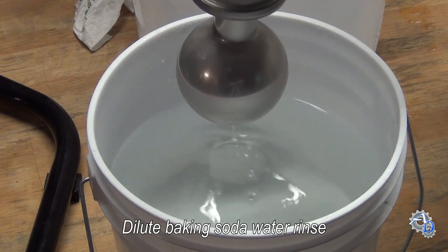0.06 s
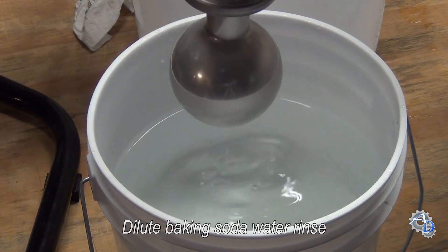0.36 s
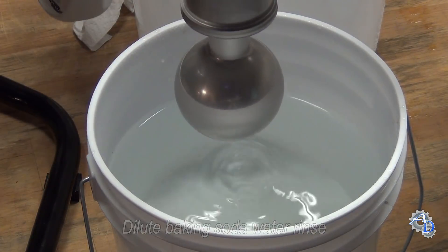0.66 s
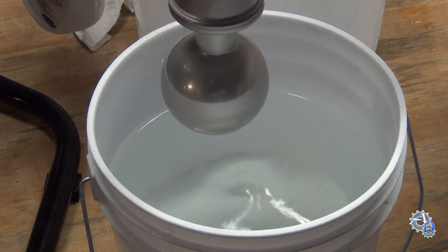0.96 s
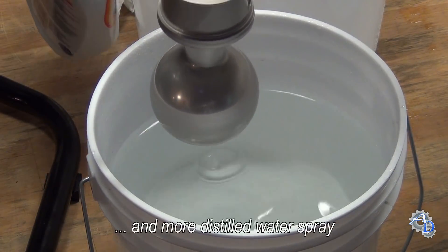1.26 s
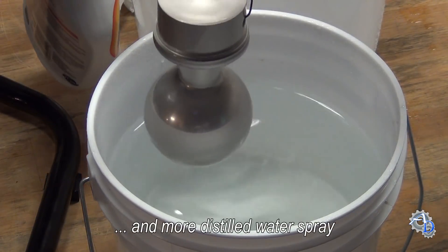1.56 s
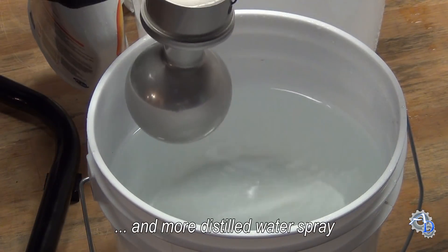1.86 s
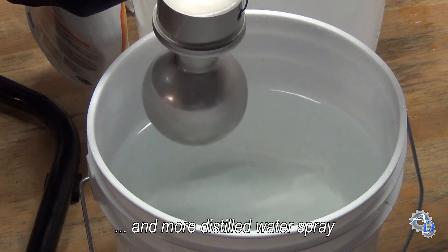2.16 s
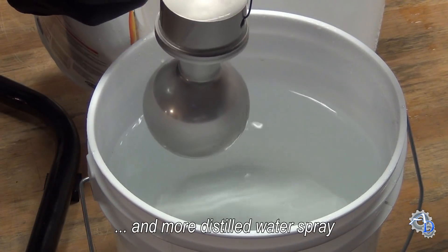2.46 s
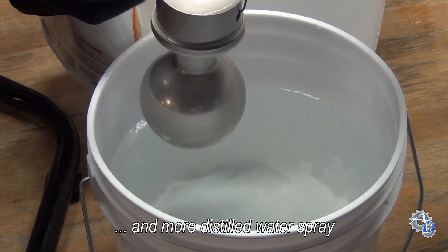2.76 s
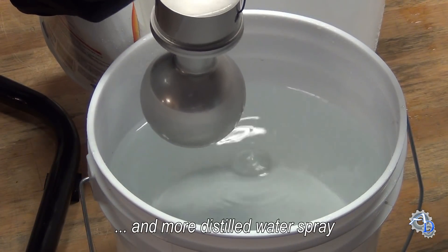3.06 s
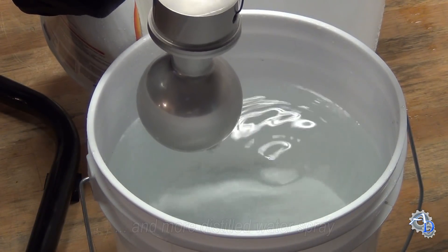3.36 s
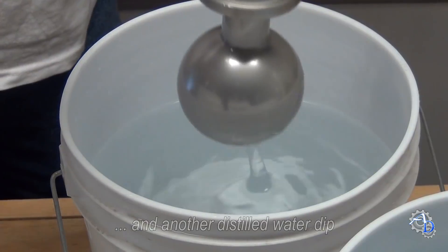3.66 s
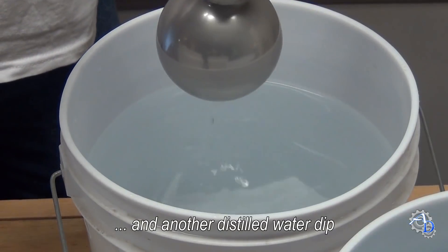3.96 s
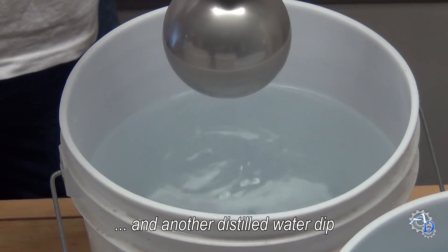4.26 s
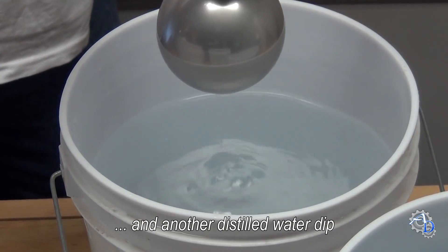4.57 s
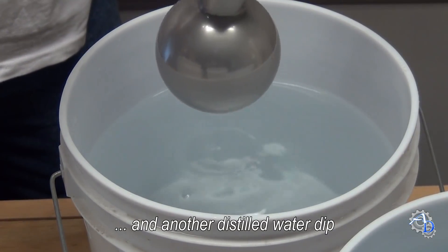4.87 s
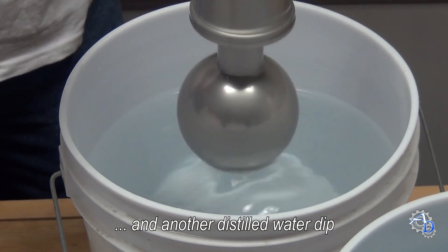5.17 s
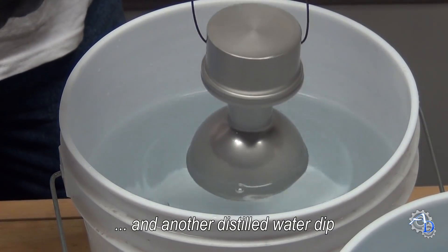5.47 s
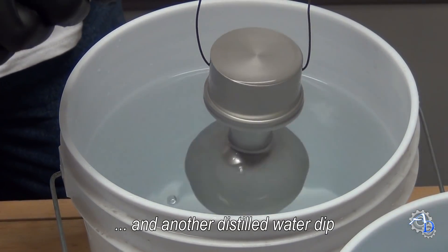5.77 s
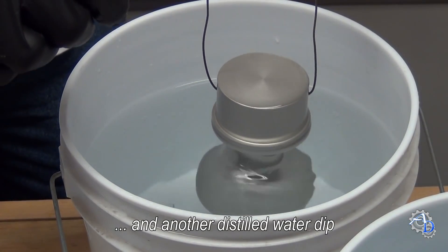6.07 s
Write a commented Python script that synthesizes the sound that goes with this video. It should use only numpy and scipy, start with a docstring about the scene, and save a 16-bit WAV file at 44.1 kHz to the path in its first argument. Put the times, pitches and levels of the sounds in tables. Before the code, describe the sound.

A trigger spray bottle gives eight short hissing, clicking squirts, then a few drops plink into a bucket of water.

```python
"""Rinsing a steel ball

A trigger spray bottle rinses a steel ball over a plastic bucket of water. In eight short squirts the jet breaks
into hissing mist; the trigger clicks, and the piston rasps as it is primed and as its spring returns it. Drops
fall from the ball and slap the water, some trapping a bubble that rings. The bucket and a small workshop
reflect the sound, and a fan whirs faintly."""
import sys
import numpy as np
from scipy import signal
from scipy.fft import rfft, irfft, next_fast_len
from scipy.io import wavfile
from scipy.ndimage import uniform_filter1d

SR = 44100
rng = np.random.default_rng(int(sys.argv[2]) if len(sys.argv) > 2 else 0)


def generate_wav(sig):
    """Save sig (samples, or channels by samples) to the path in sys.argv[1] as 16-bit PCM at SR."""
    pcm = np.round(np.clip(np.atleast_2d(sig).T, -1, 1) * 32767).astype(np.int16)
    wavfile.write(sys.argv[1], SR, pcm)


N = 270332

# Squeezes of the trigger, with relative levels: (time [s], pressure rise [s], stroke length [s],
# hiss [dB], click [dB], nozzle whistle [Hz], hollow note [Hz], hollow note level [dB])
SQUEEZES = [ (0.672, 0.031, 0.069, -26.5, -38.5, 8950, 3380, -37),
            (0.93, .044, .075, -24, -48, 8600, 3850, -33), (1.858, 0.022, 0.071, -27, -41, 8130, 2250, -26),
            (2.158, 0.035, 0.079, -26.5, -41, 7210, 2180, -26),
            (2.441, 0.039, 0.081, -27, -44, 7300, 2140, -23.5),
            (2.7161, 0.032, 0.081, -23, -35.5, 7600, 1990, -24),
            (2.990, 0.033, 0.068, -23.5, -44.5, 7600, 1910, -23.5),
            (3.249, 0.044, 0.062, -24, -42, 7600, 1850, -23.5), ]
# Spectrum of the mist's hiss: (frequency [Hz], spectral level [dB])
MIST_SPECTRUM = [(590, -38.5), (1000, -28.5), (1180, -22.5), (1610, -28), (1910, -23.5), (2620, -21.5),
                 (4730, -13.5), (5500, -12), (7440, -1.5), (8750, 0.5), (10300, -7), (12500, -11),
                 (15500, -25), (16000, -32)]
# Resonances of the nozzle head: (frequency [Hz], bandwidth [Hz], gain [dB])
NOZZLE_MODES = [(5120, 890, -15.5), (7150, 130, 0.5), (7714, 170, 2), (8615, 110, 1.5), (9460, 180, -4),
                (11400, 480, -5), (12200, 270, -5), (12700, 210, -15)]
# Response of the plastic housing: (frequency [Hz], spectral level [dB])
PLASTIC_SPECTRUM = [(150, -31), (450, -6), (1000, -6.5), (2000, -6), (3100, -0.5), (4000, 0), (5100, -2.5),
                    (7000, 0.5), (9500, -13), (14000, -26)]


def amp(db):
    """Amplitude ratio of a level in decibels."""
    return 10 ** (np.asarray(db) / 20)


def unit_rms(x):
    """Normalise to rms 1."""
    return x / np.sqrt(np.mean(x ** 2) + 1e-20)


def unit_peak(x):
    """Normalise so that the loudest millisecond has rms 1."""
    return x / np.sqrt(uniform_filter1d(x ** 2, size=44).max() + 1e-20)


def curve_at(points, hz):
    """Interpolate (frequency [Hz], value) points on a logarithmic frequency axis."""
    freqs, values = np.transpose(points)
    return np.interp(np.log(hz + 1), np.log(freqs + 1), values)


def add(track, start, x):
    """Superpose x on the track from start [s] on."""
    part = track[max(round(start * SR), 0):][:len(x)]
    part += x[:len(part)]


def filtered(x, response):
    """Linear filtering: multiply the spectrum of x by a complex frequency response."""
    n = x.shape[-1]
    size = next_fast_len(n + 8192)
    return irfft(rfft(x, size) * response(np.fft.rfftfreq(size, 1 / SR)), size)[..., :n]


def coloured(x, spectrum):
    """Minimum-phase filtering by a curve of (frequency [Hz], gain [dB])."""
    size = 1024
    gain = amp(curve_at(spectrum, np.fft.rfftfreq(size, 1 / SR)))
    cepstrum = irfft(np.log(gain + 1e-6))
    cepstrum[1:size // 2] *= 2  # folding the cepstrum makes the filter causal
    cepstrum[size // 2 + 1:] = 0
    return signal.fftconvolve(x, irfft(np.exp(rfft(cepstrum))))[:len(x)]


def resonate(x, modes):
    """Forced response of parallel damped modes: (frequency [Hz], bandwidth [Hz], gain [dB])."""
    return filtered(x, lambda f: sum(amp(db) * 1j * f * width / (hz * hz - f * f + 1j * f * width)
                                     for hz, width, db in modes))


def grains(n, rate, scatter_db):
    """Shot noise: random impulses of log-normal size, rate per second on average, rms 1."""
    impulses = (rng.random(n) < rate / SR) * rng.choice([-1, 1], n)
    return unit_rms(impulses * amp(scatter_db * rng.standard_normal(n)))


def burst(t60):
    """Exponentially damped noise, falling 60 dB in t60 seconds."""
    t = np.arange(SR // 10) / SR
    return rng.standard_normal(len(t)) * amp(-60 * t / t60)


def fan(shift_at_s=3.49, shift_s=0.015):
    """Flow noise: a broadband rush with narrow whirs; the background's levels step once after the spraying."""
    # Rush of air: (frequency [Hz], spectral level [dB])
    air_spectrum = [(25, -30), (45, -4), (80, 0), (170, 0.5), (320, 0), (600, -2), (1000, -4), (1500, -7.5),
                    (3000, -10), (5500, -13), (7600, -11.5), (9500, -17.5), (16000, -23.5)]
    # Likeness of the rush in the two ears: (frequency [Hz], correlation [ratio])
    correlation = [(60, 0.18), (180, 0.69), (550, 0.79), (1650, 0.97), (4970, 0.97), (15000, 0.89)]
    # Whirs: (frequency [Hz], half-width [Hz], level before the shift [dB], level after it [dB])
    whirs = [(879.8, 29, -63.5, -67), (231.6, 6.3, -69.5, -79), (91.6, 6.4, -75.5, -72),
             (214, 160, -91, -69)]

    def level(before_db, after_db):
        return amp(np.interp(np.arange(N) / SR, [shift_at_s, shift_at_s + shift_s], [before_db, after_db]))

    def mid_side_gains(hz):
        angle = np.arccos(np.clip(curve_at(correlation, hz), -1, 1)) / 2
        return amp(curve_at(air_spectrum, hz)) * [np.cos(angle), np.sin(angle)]

    mid, side = filtered(rng.standard_normal((2, N)), mid_side_gains)
    air = unit_rms(np.array([mid + side, mid - side])) * level(before_db=-58, after_db=-59.5)
    for hz, width, before_db, after_db in whirs:
        whir = filtered(rng.standard_normal(N), lambda f: 1 / (1 + ((f - hz) / width) ** 2))
        air += unit_rms(whir) * level(before_db, after_db)
    return air


def workshop(x, side_gain=0.014):
    """Reverberation: each frequency decays at its own rate, nearly alike in both ears."""
    # Decay of the room: (frequency [Hz], reverberation time [s])
    decay_times = [(300, 0.24), (2000, 0.49), (8000, 0.24), (15000, 0.18)]
    hz, t, noise = signal.stft(rng.standard_normal((2, SR // 2)), SR, nperseg=256)
    decay = amp(-60 * t / curve_at(decay_times, hz)[:, None])
    tail = signal.istft(noise * decay, SR, nperseg=256)[1]
    tail *= np.arange(tail.shape[1]) / SR > 0.005  # delay of the first reflection
    mid, side = signal.fftconvolve(x[None], tail / np.linalg.norm(tail[0]), axes=1)[:, :N]
    return np.array([mid + side_gain * side, mid - side_gain * side])


def bucket(x, echo_db=-7, t60=0.046):
    """Multiple reflection between the walls and the water adds dense, brief echoes to the sound."""
    t = np.arange(SR // 10) / SR
    echoes = grains(len(t), rate=2600, scatter_db=-1.0) * amp(-60 * t / t60) * (t > 0.001)
    return x + amp(echo_db) * signal.fftconvolve(x, echoes / np.linalg.norm(echoes))[:N]


def settling_mist(level_db=-36, fade_db_per_s=22):
    """Many tiny impacts sum to a faint, fading patter as mist lands on the water and the bucket."""
    out = np.zeros(N)
    t = np.arange(SR) / SR
    for start, _, length, db, *_ in SQUEEZES:
        impacts = grains(SR, rate=900, scatter_db=1.5) + rng.standard_normal(SR)
        envelope = np.minimum(t / length, 1) * amp(db + level_db - fade_db_per_s * t)
        add(out, start, envelope * unit_rms(coloured(impacts, PLASTIC_SPECTRUM)))
    return out


def dribble(until_s=1.1, drops_per_s=10, db=-45.5, centre_hz=4000, width_hz=4000):
    """Fine drops leave the wet ball at random: rows for drop_impacts, within an octave of centre_hz."""
    draws = rng.random((round(until_s * drops_per_s), 2))
    return [(until_s * when, db, centre_hz * 2 ** (2 * pitch - 1), width_hz) for when, pitch in draws]


def drop_impacts(splash_gain=0.16):
    """Impact sound: each drop gives the water one sharp pressure pulse and a little splash."""
    # Drops striking the water: (time [s], peak level [dB], band centre [Hz], bandwidth [Hz])
    drops = [(0.0516, -41.5, 2350, 3000), (.105, -43, 5430, 5000), (.201, -49.5, 1570, 1200),
             (.216, -44.5, 7760, 1800), (0.284, -42, 2200, 4000), (.4264, -46, 4500, 4000),
             (3.7145, -45, 9900, 1990), (3.7893, -28.5, 7650, 1300), (3.794, -23, 6960, 5900),
             (3.8275, -40, 8600, 3000), (4.1061, -46.5, 12300, 4000), (4.2133, -41.5, 2000, 5030),
             (4.462, -23, 4300, 7200), (4.8189, -44.5, 2570, 3480)]
    slap_spectrum = [(600, -26), (1150, -2), (1600, -2), (8500, 1.5), (10500, -3), (15000, -11)]
    out = np.zeros(N)
    for start, db, hz, width in drops + dribble():
        splash = burst(t60=0.0032) + 0.36 * burst(t60=0.045)
        pulse = signal.unit_impulse(len(splash)) + splash_gain * splash
        band = [(hz, width, 0)]
        slap = resonate(resonate(pulse, band), band)
        add(out, start, amp(db) * unit_peak(coloured(slap, slap_spectrum)))
    return out


def bubbles(pitch_rise=0.043, attack_s=0.00011):
    """Bubble resonance: trapped air rings as a damped oscillator, sharpening as it nears the surface."""
    # Trapped bubbles: (time [s], starting pitch [Hz], level [dB], 60 dB decay time [s])
    trapped = [(0.054, 2930, -48, 0.043), (0.284, 1220, -47.5, 0.028), (0.398, 7300, -27, 0.0057),
               (.428, 4320, -48.5, .025), (3.49, 1340, -59, 0.26), (3.7893, 6600, -23, 0.013),
               (3.7946, 4130, -31, 0.019), (3.8278, 7880, -21.5, 0.0068), (3.837, 2520, -45.5, .035),
               (4.214, 1530, -43, 0.042), (4.225, 1437, -42.5, 0.14), (4.462, 1814, -32, 0.042),
               (4.469, 1534, -41, 0.059), (4.462, 2410, -32, 0.028), (4.462, 7200, -23, 0.011),
               (4.462, 4360, -40, 0.02)]
    out = np.zeros(N)
    t = np.arange(SR // 4) / SR
    for start, hz, db, t60 in trapped:
        pitch = hz * (1 + pitch_rise * np.minimum(t / t60, 1))
        envelope = amp(db - 60 * t / t60) * (1 - np.exp(-t / attack_s))
        add(out, start, envelope * np.sin(2 * np.pi * np.cumsum(pitch) / SR))
    return out


def piston(rasp_s=0.028, rasp_db=-5):
    """Stick-slip friction: the piston rasps in the housing as the trigger is primed and as the spring pushes it
    back."""
    # Rubs of the piston in its bore: (time [s], relative level [dB])
    rasps = [(0.627, -48), (0.866, -47), (0.894, -44.5), (.929, -41), (1.125, -45.5), (2.056, -49.5),
             (2.353, -47), (2.639, -44), (2.904, -47), (3.173, -51.5), (3.422, -43)]
    out = np.zeros(N)
    n = int(rasp_s * SR)
    envelope = signal.windows.tukey(n, 0.3) * amp(np.linspace(0, -4, n))
    for start, db in rasps:
        slips = grains(n, rate=1100, scatter_db=2.5) + 0.44 * rng.standard_normal(n)
        rasp = coloured(np.pad(slips * envelope, (0, n)), PLASTIC_SPECTRUM)
        add(out, start, amp(db + rasp_db) * unit_rms(rasp))
    return out


def trigger(pull_snap_db=1.5):
    """Impulsive excitation: each snap of the trigger rings the nozzle head and knocks the housing."""
    # Further trigger clicks and spits of the pump: (time [s], nozzle snap [dB], housing knock [dB])
    clicks = [(0.634, -39, -42.5), (0.6807, -38, -48), (0.8001, -35, -49.5), (0.9045, -22.5, -44),
              (0.945, -21, -37), (1.1227, -35, -50), (1.2001, -63, -45.5), (1.877, -26, -44),
              (1.898, -25, -40.5), (1.922, -23.5, -59), (2.055, -63, -44), (2.2565, -25, -50),
              (2.356, -51, -46), (2.452, -26, -42), (2.463, -23.5, -37.5), (2.722, -23, -37.5),
              (3.1679, -24, -42.5), (3.3056, -16.5, -48), (3.418, -31, -47), (3.4655, -45, -50.5)]
    pulls = [(start, click_db + pull_snap_db, click_db) for start, _, _, _, click_db, *_ in SQUEEZES]
    out = np.zeros(N)
    for start, snap_db, knock_db in pulls + clicks:
        ring = unit_peak(coloured(resonate(burst(t60=0.0021), NOZZLE_MODES), MIST_SPECTRUM))
        puff = unit_peak(coloured(burst(t60=0.0038), MIST_SPECTRUM))
        snap = unit_peak(ring + 0.44 * puff)
        knock = unit_peak(coloured(burst(t60=0.052), PLASTIC_SPECTRUM))
        add(out, start, amp(snap_db) * snap + amp(knock_db) * knock)
    return out


def jet_flow(t, rise, length, valve_delay_s=0.0042, ease_s=0.015, drain_db_per_s=535):
    """Pressure-driven flow: it swells once the valve opens, holds for the stroke, then drains."""
    swell = np.clip((t - valve_delay_s) / rise, 0, 1) ** 1.08
    draining_s = np.hypot(np.maximum(t - length, 0), ease_s) - ease_s
    return swell * amp(-drain_db_per_s * draining_s)


def jet_noise(n):
    """Atomisation: the jet tears into droplets, giving hiss and patter of equal power."""
    return rng.standard_normal(n) + grains(n, rate=3500, scatter_db=3.5)


def spray(hiss_db=-4, ring_db=-1, whistle_db=-6, hollow_db=-5, linger_s=0.046,
          whistle_width_hz=200, hollow_width_hz=380):
    """Resonance driven by noise: the hissing jet rings in the nozzle head, and the settling spray rings a
    hollow note in fine bubbles on the water."""
    out = np.zeros(N)
    n = SR // 3
    t = np.arange(n) / SR
    treble_shelf = [(9000, 0), (12000, -1.5)]
    for start, rise, length, db, _, whistle_hz, note_hz, note_db in SQUEEZES:
        flow = amp(db + hiss_db) * jet_flow(t, rise, length)
        # the nozzle's resonant frequencies shift a little with every squeeze
        detune = 1 + 0.013 * rng.standard_normal((len(NOZZLE_MODES), 1)) * [1, 0, 0]
        ring = resonate(jet_noise(n), np.array(NOZZLE_MODES) * detune)
        ring = unit_rms(filtered(ring, lambda f: 1 / (1 + (4000 / (f + 1)) ** 4)))  # high-pass
        whistle = resonate(jet_noise(n), [(whistle_hz, whistle_width_hz, 0)])
        whistle = unit_rms(coloured(whistle, MIST_SPECTRUM))
        hiss = unit_rms(coloured(jet_noise(n), MIST_SPECTRUM))
        mist = hiss + amp(ring_db) * ring + amp(whistle_db) * whistle
        add(out, start, coloured(flow * mist, treble_shelf))
        # droplets keep landing for a moment after the jet has left the nozzle
        landing = signal.fftconvolve(flow, np.exp(-t / linger_s) / (linger_s * SR))[:n]
        band = [(note_hz, hollow_width_hz, 0)]
        hollow_note = unit_rms(resonate(resonate(jet_noise(n), band), band))
        add(out, start, amp(note_db + hollow_db) * (flow + landing) * hollow_note)
    return out


def scene(reverb_db=-12.5):
    """Superposition: the nearby bottle and drips, their reverberation and the fan."""
    bottle = spray() + settling_mist() + trigger() + piston()
    water = bucket(drop_impacts() + bubbles())
    direct = bottle + water
    return direct + workshop(amp(reverb_db) * direct) + fan()


def record(dry, phase_rad=1.46, cutoff_hz=15800):
    """Phase difference and band limit: left and right part slightly in the treble, then are low-passed."""
    # Left-right difference against the common sound: (frequency [Hz], level [dB])
    side_spectrum = [(2000, -75), (4500, -60), (5700, -15), (7000, -15), (8000, -20), (9300, -20.5),
                     (10000, -33), (12000, -40), (14000, -60)]
    common = dry.mean(axis=0)
    side = filtered(common, lambda hz: np.exp(1j * phase_rad) * amp(curve_at(side_spectrum, hz)))
    return filtered(dry + np.array([side, -side]), lambda hz: hz < cutoff_hz)


dry = scene()
out = record(dry)
generate_wav(out)
```